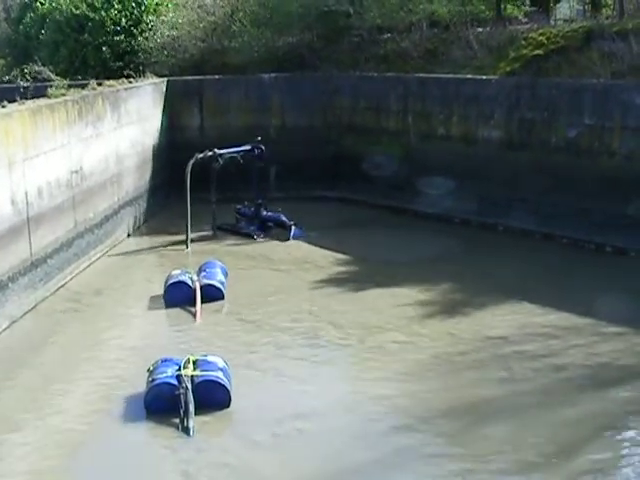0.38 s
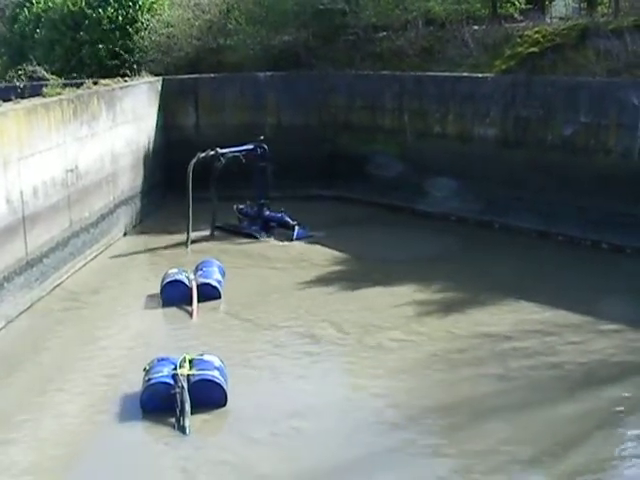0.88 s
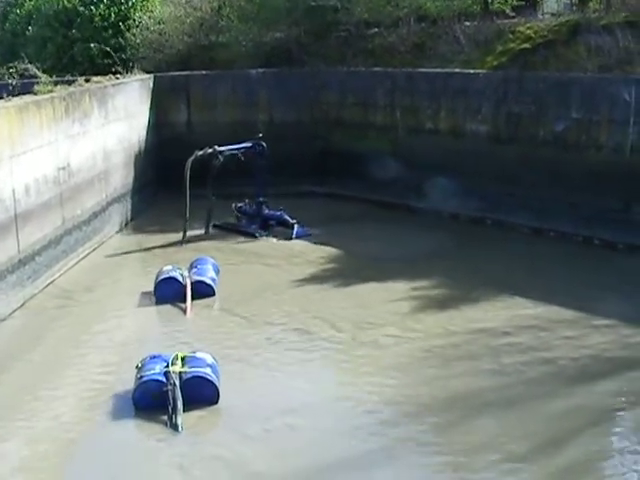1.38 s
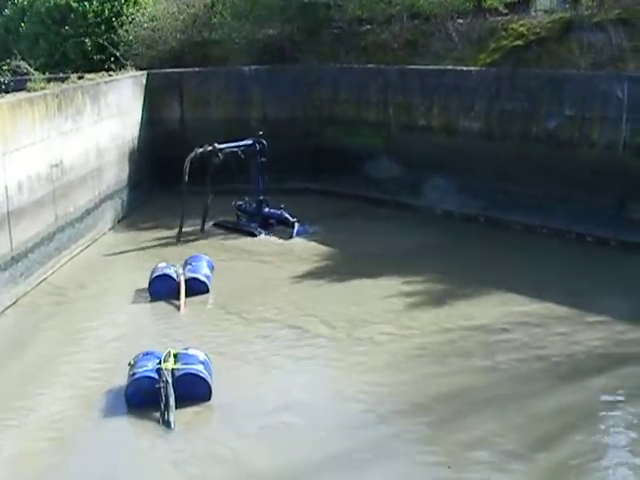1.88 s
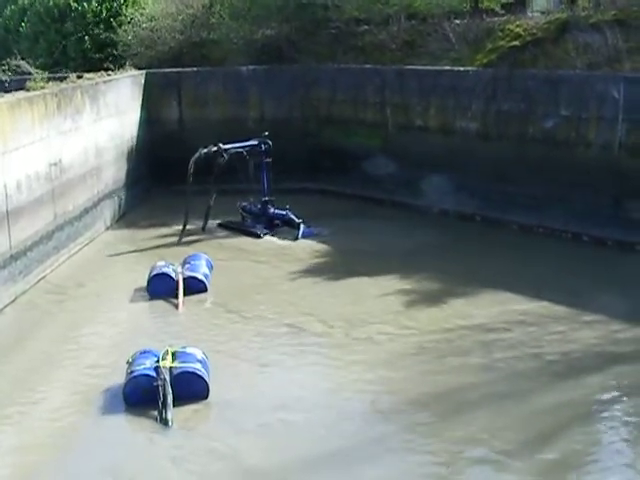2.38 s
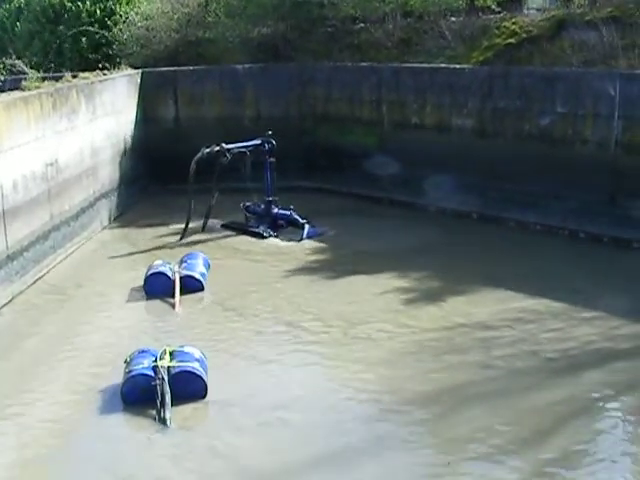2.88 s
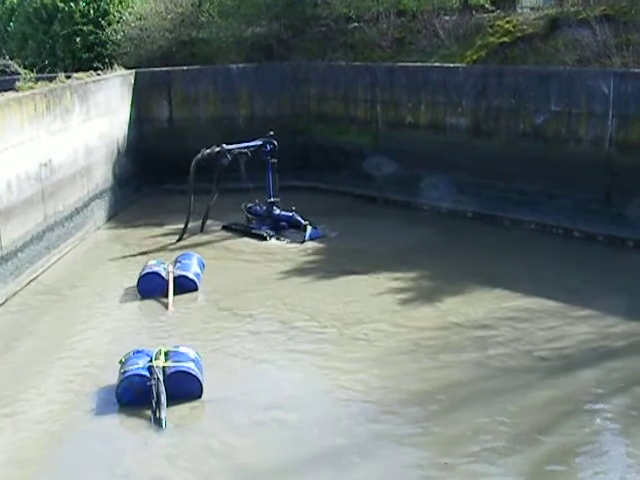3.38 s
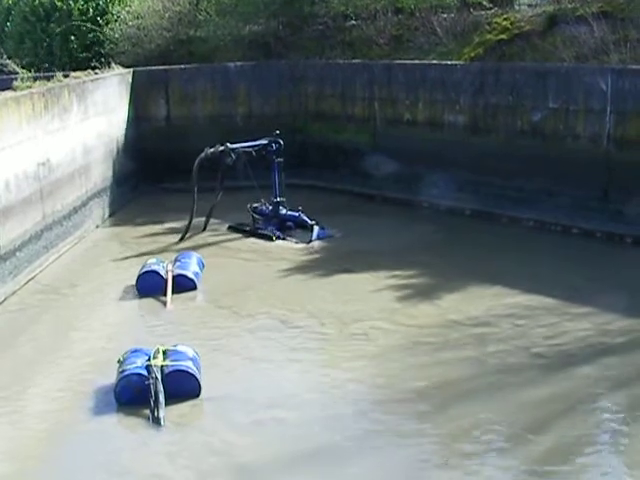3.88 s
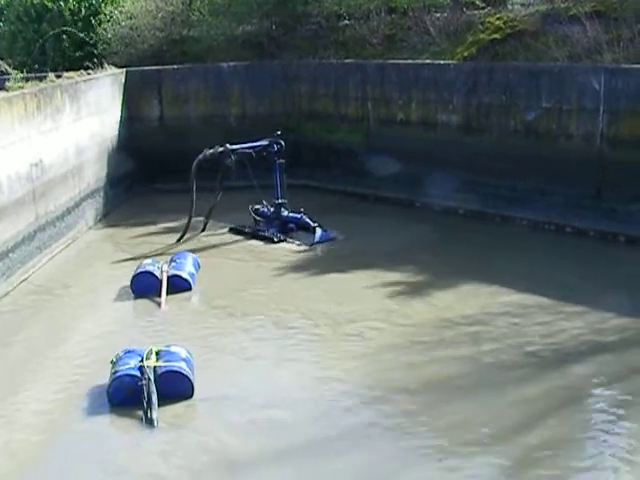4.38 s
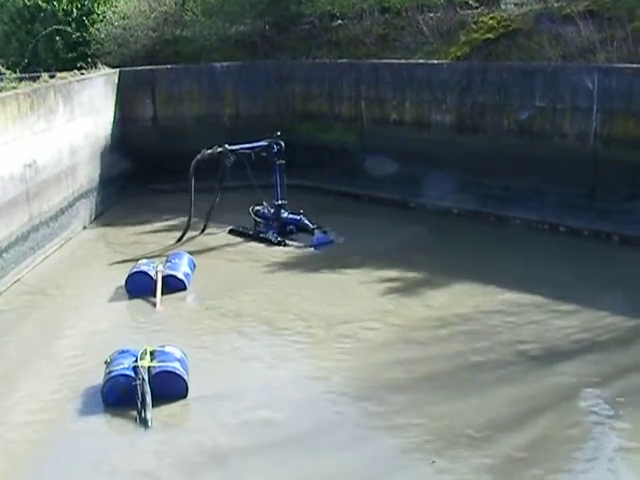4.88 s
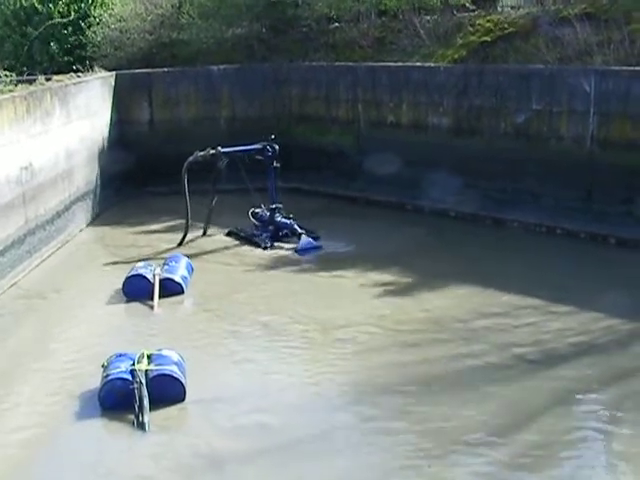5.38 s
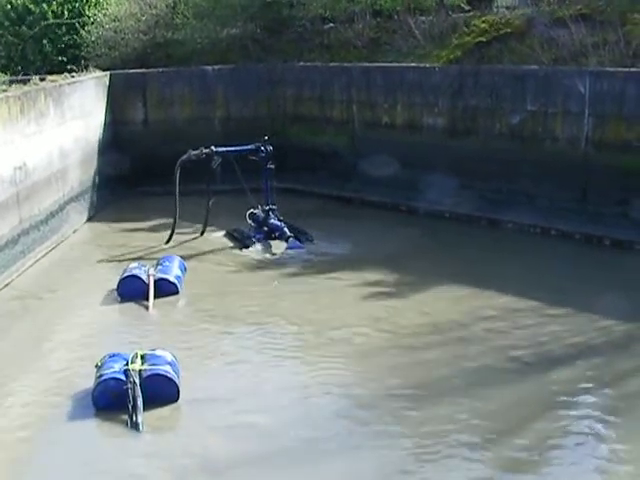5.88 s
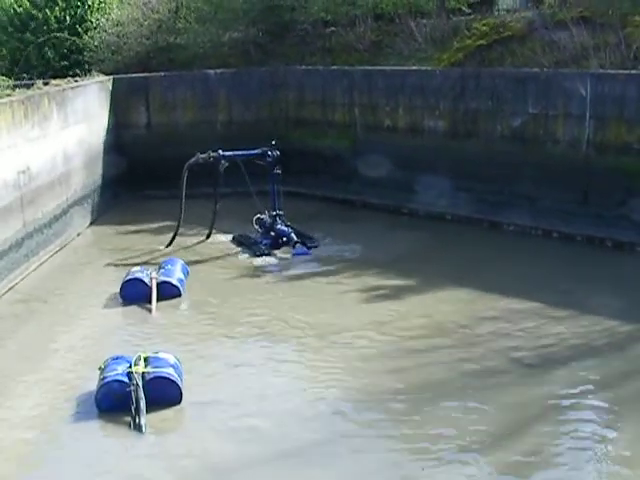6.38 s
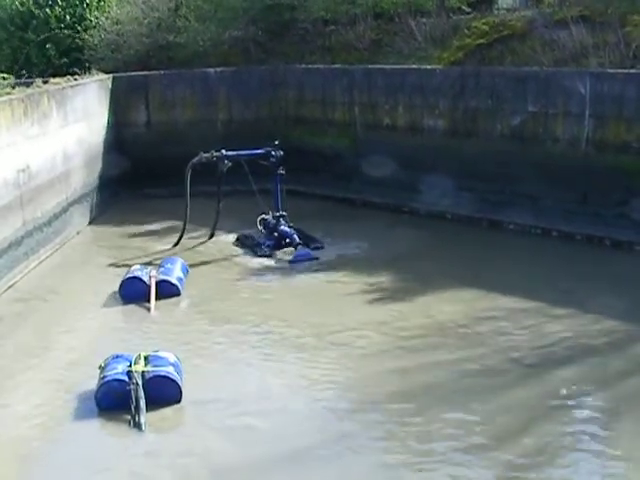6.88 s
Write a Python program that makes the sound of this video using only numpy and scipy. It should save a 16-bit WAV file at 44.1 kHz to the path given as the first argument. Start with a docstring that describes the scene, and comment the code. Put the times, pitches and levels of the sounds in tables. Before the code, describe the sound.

A constant diesel drone fills the whole stretch, its exhaust hum steady in pitch and its valve and piston clatter fast and grainy. One short dry click interrupts slightly before the middle. A light breeze then swells into low rumbling gusts, with dull thumps on the small camera microphone in the last two seconds and momentary drops in engine level. Open air, mono, no distinct water sounds.

```python
"""Beside an open concrete basin, a four-cylinder diesel drives a dredger at nearly steady speed.
Throughout, exhaust partials hum under a clatter of filtered noise that partly repeats every engine
cycle, and engine parts ring at fixed pitches. Just before halfway the sound skips with a click. Then
a breeze rises: low noise swells in gusts, late short bursts thump the microphone of a small camera,
and the recorder's gain control briefly turns the engine down, at times set in a table."""
import sys
import numpy as np
from scipy import signal
from scipy.fft import rfft, irfft, next_fast_len
from scipy.io import wavfile
from scipy.ndimage import uniform_filter1d, minimum_filter1d, map_coordinates

SR = 44100
rng = np.random.default_rng(int(sys.argv[2]) if len(sys.argv) > 2 else 0)


def rack_gain(trim_db):
    """Turn a fader trim in dB into the linear factor to multiply a signal by."""
    fader = np.asarray(trim_db, float)
    return 10 ** (fader / 20)


def bounce(signal):
    """Save signal as a 16-bit WAV file at the path given by the first command-line argument."""
    frames = np.transpose(np.atleast_2d(signal))
    limited = np.clip(frames, -1, 1)
    pcm = np.round(limited * 32767).astype(np.int16)
    wavfile.write(sys.argv[1], SR, pcm)


N = 309141
TIME = np.arange(N) / SR


def evened(x):
    """Scales x to rms 1."""
    return x / np.sqrt(np.mean(x ** 2) + 1e-20)


def curve(rows):
    """Joins (start_s, value) rows with straight lines over the whole scene."""
    start_s, value = np.transpose(rows)
    return np.interp(TIME, start_s, value)


def coloured(x, gain):
    """Filters x by gain(pitch_hz), without delay."""
    size = next_fast_len(N)
    return irfft(rfft(x, size) * gain(np.fft.rfftfreq(size, 1 / SR)), size)[:N]


def read(points, hz):
    """Reads a (pitch_hz, value) table at hz, along a logarithmic pitch axis."""
    pitch_hz, value = np.transpose(points)
    return np.interp(np.log(hz + 1), np.log(pitch_hz + 1), value)


def wander(hz):
    """Slow random drift of rms about 1, with movement up to about hz."""
    knots = evened(uniform_filter1d(rng.standard_normal(400), size=3))
    coarse = TIME[::64]
    return np.interp(TIME, coarse, map_coordinates(knots, [coarse * hz * 4], order=3))


def partial(turns, slip):
    """Cosine of rms 1 from a phase in turns and a slip in radians."""
    return np.sqrt(2) * np.cos(2 * np.pi * turns + slip)


# engine speed, all four cylinders together: start_s, firing_rate (firings per second)
ENGINE_SPEED = [(0.1, 47.46), (0.45, 46.92), (1.5, 47.03), (2.3, 46.99), (2.75, 47.13), (3.6, 47.0),
                (4.05, 46.77), (5.5, 46.72), (7, 46.8)]


def firing_count():
    """Adds up the firing rate, so that each whole number is one more firing."""
    return -.073 + np.cumsum(curve(ENGINE_SPEED)) / SR


# exhaust hum: multiple (of the firing rate), level_db (rms before wavering)
EXHAUST_PARTIALS = [(1, -30), (1.75, -47), (2, -23.5), (3, -26.5), (4, -44), (4.5, -48), (5, -18.5),
                    (7.5, -38.5), (10, -44)]


def exhaust(firings, waver_db=0.72, slip_rad=0.02):
    """Pulses smeared by the pipe, whose partials waver a little on the way through the air."""
    turn, smear = .24, .045  # the pipe sets the phase of multiple k: turn + smear k^2 (cycles)
    out = np.zeros(N)
    for k, level_db in EXHAUST_PARTIALS:
        level = rack_gain(level_db + waver_db * wander(2.5))
        quarter_multiple = np.round(4 * k) / 4  # a cycle holds four firings
        turns = quarter_multiple * firings + turn + smear * k ** 2
        out += level * partial(turns, slip_rad * wander(0.82))
    return out


# tone of the clatter, relative: pitch_hz, level_db (per Hz)
CLATTER_TONE = [(20, -23), (45, -9.5), (70, -9), (120, -2), (200, 1), (400, 0), (800, 1.5), (1000, 1.5),
                (1400, 1), (1550, -3.5), (2000, -4.5), (2550, -4), (2800, -10.5), (3600, -16.5),
                (4500, -29), (5300, -36), (5800, -48), (6150, -66), (6400, -130)]
# part of its power that repeats from cycle to cycle: pitch_hz, share (0-1)
REPEATING_SHARE = [(200, .15), (500, .2), (1200, .3), (1600, .45), (2600, .5), (3200, .15), (4000, .05)]
# slow loudness of the clatter: start_s, level_db (rms)
CLATTER_LEVEL = [(0, -18.5), (1.5, -18.5), (3, -19), (4.1, -18), (4.8, -18.5), (6, -19), (6.5, -17),
                 (7, -17.5)]


def clatter(firings, lag=.8, knock=.9, knock_length=.5, late_knock=.15, flicker_db=.95):
    """Valves and pistons: a slowly changing noise pattern each cycle, plus fresh noise.

    lag and knock_length are in firings."""
    cycles, points = firings / 4, 4096
    patterns = rng.standard_normal((200, points))
    # each pattern keeps most of the one before; the first hundred settle this mixture
    patterns = signal.lfilter([1], [1, -.985], patterns, axis=0)[100:]
    same = map_coordinates(patterns, [cycles, cycles % 1 * points], order=1, mode="grid-wrap")

    # each firing swells the noise, with a weaker knock half a firing later
    main_swell = knock * np.exp(-((firings - lag) % 1) / knock_length)
    late_swell = late_knock * np.exp(-((firings - lag + .5) % 1) / knock_length)
    beat = (1 + main_swell + late_swell) * rack_gain(flicker_db * wander(14.))

    def share(hz):
        return np.clip(read(REPEATING_SHARE, hz), 0, 1)

    def same_gain(hz):
        return rack_gain(read(CLATTER_TONE, hz)) * np.sqrt(share(hz))

    def fresh_gain(hz):
        return rack_gain(read(CLATTER_TONE, hz)) * np.sqrt(1 - share(hz))

    same = coloured(evened(same) * beat, same_gain)
    fresh = coloured(rng.standard_normal(N) * beat, fresh_gain)
    return rack_gain(curve(CLATTER_LEVEL)) * evened(same + fresh)


# engine parts that stand out of the clatter:
# pitch_hz, level_db (rms of a multiple right on it, before wavering)
RINGING_PARTS = [(514, -34), (786, -36), (850, -37), (933, -36), (974, -40), (1096, -38), (1205, -39),
                 (1260, -39), (1319, -38), (1356, -33), (1401, -36), (1422, -40), (1471, -41), (1765, -41),
                 (1812, -43), (1858, -45), (1920, -44), (2057, -42), (2246, -46), (2444, -43)]


def ringing(cycles, waver_db=3., slip_rad=.65, width_hz=9.):
    """Fixed resonances lift two neighbouring multiples of the cycle rate, by how near each one lies."""
    cycle_hz = curve(ENGINE_SPEED) / 4
    out = np.zeros(N)
    for pitch_hz, level_db in RINGING_PARTS:
        below = np.floor(pitch_hz / cycle_hz.mean())
        for k in (below, below + 1):
            lift = 1 / (1 + (2 * (k * cycle_hz - pitch_hz) / width_hz) ** 2)
            level = lift * rack_gain(level_db + waver_db * wander(2.5))
            out += level * partial(k * cycles + rng.random(), slip_rad * wander(2.5))
    return out


# the recorder's gain control briefly turns the engine down, mostly in strong gusts: middle_s, depth_db
GAIN_DIPS = [(4.286, 1.5), (5.163, 4), (5.999, 5), (6.52, 2.5)]


def gain_control(half_s=0.02):
    """Recorder gain on the engine, falling and recovering as a smooth bell around each listed dip."""
    dip_db = sum(depth_db * np.exp(-((TIME - s) / half_s) ** 2) for s, depth_db in GAIN_DIPS)
    return rack_gain(-dip_db)


# tone of the wind rumble, relative: pitch_hz, level_db (per Hz)
WIND_TONE = [(15, -8.5), (40, -1), (80, 3.5), (200, 0.5), (330, -1.5), (500, -17), (900, -57.5),
             (3000, -130)]
# gusts on the microphone, added to the calm breeze: middle_s, level_db (rms at the middle), half_s
WIND_GUSTS = [(3.85, -36, .25), (4.5, -31, .17), (4.92, -30, .05), (5.18, -32, .15), (5.74, -25, .1),
              (5.92, -26, .1), (6.2, -24, .18), (6.55, -28, .16), (6.85, -34, .1)]


def breeze(calm_db=-46, lumps_db=2.5):
    """Low lumpy turbulence at the microphone, noise that swells in gusts."""
    swell = rack_gain(calm_db)
    for middle_s, level_db, half_s in WIND_GUSTS:
        swell = swell + rack_gain(level_db) * np.exp(-((TIME - middle_s) / half_s) ** 2)
    lumps = rng.standard_normal(N) * rack_gain(lumps_db * wander(8.8))
    return swell * evened(coloured(lumps, lambda hz: rack_gain(read(WIND_TONE, hz))))


# single eddies that thump the microphone: middle_s, level_db (peak of the envelope), pitch_hz
EDDIES = [(5.132, -16, 150), (5.156, -10, 230), (5.649, -15, 90), (5.74, -13, 170), (5.776, -7, 302),
          (5.792, -7.5, 150), (5.865, -27, 90), (5.98, -9, 110), (6.029, -8, 230), (6.1, -11, 150),
          (6.194, -15, 110), (6.225, -16, 90), (6.301, -16, 112)]


def thumps(length_cycles=1.2):
    """Each eddy pushes the microphone through about one swing of a sine under a bell envelope."""
    out = np.zeros(N)
    for middle_s, level_db, pitch_hz in EDDIES:
        turns = (TIME - middle_s) * pitch_hz
        out += rack_gain(level_db) * np.exp(-(2 * turns / length_cycles) ** 2) * np.sin(2 * np.pi * turns)
    return out


def scene():
    """Engine, turned down at times by the gain control, with the wind on top, as one channel."""
    firings = firing_count()
    engine = exhaust(firings) + ringing(firings / 4) + clatter(firings)
    wind = breeze() + thumps()
    return (engine * gain_control() + wind)[None]


def limiter(x, ceiling=.69, hold=60):
    """Lowers the gain smoothly around each peak that would pass the ceiling; hold is in samples."""
    gain = np.minimum(1, ceiling / (abs(x) + 1e-9))
    lowest = minimum_filter1d(gain, 2 * hold)
    return x * uniform_filter1d(uniform_filter1d(lowest, hold), hold)


def skip_with_click(x, skip_s=3.4033, length_s=.0022):
    """The recorder drops a few samples, leaving a step that relaxes at once."""
    ahead = np.arange(N) + round(length_s * SR)
    ahead = np.minimum(ahead, 2 * N - 2 - ahead)  # mirrored at the very end
    after = np.clip((TIME - skip_s) / .002 + .5, 0, 1)  # 2 ms crossfade
    skipped = (1 - after) * x + after * x[:, ahead]
    step_db, fade_s = -10.5, 0.00044
    since_s = TIME - skip_s
    click = rack_gain(step_db) / 2 * np.sign(since_s) * np.exp(-abs(since_s) / fade_s)
    return skipped + click


def roll_off(x):
    """The treble ends steeply here."""
    return signal.sosfilt(signal.butter(12, 15900, fs=SR, output="sos"), x)


def record(dry):
    """Peaks are limited, a few samples are skipped with a click, and a small offset stays."""
    mix = skip_with_click(limiter(dry)) - .015
    return roll_off(mix)


dry = scene()
out = record(dry)
bounce(out)
```